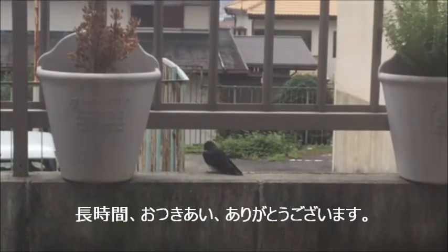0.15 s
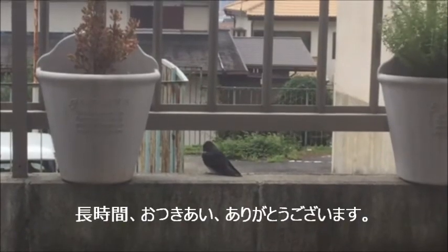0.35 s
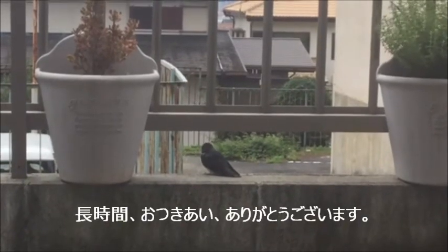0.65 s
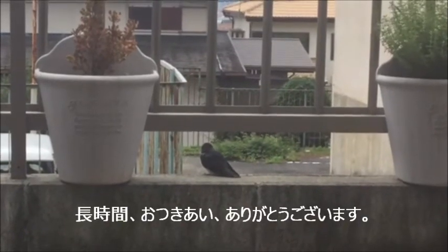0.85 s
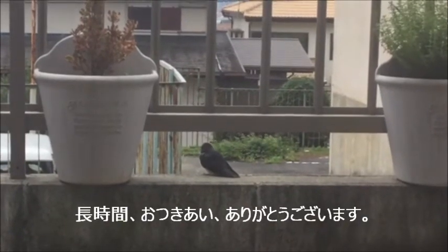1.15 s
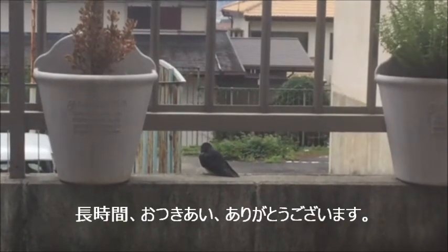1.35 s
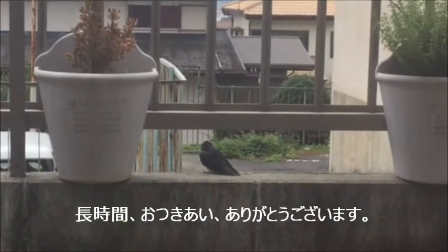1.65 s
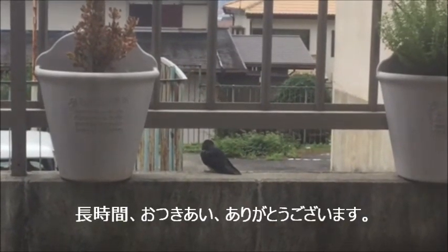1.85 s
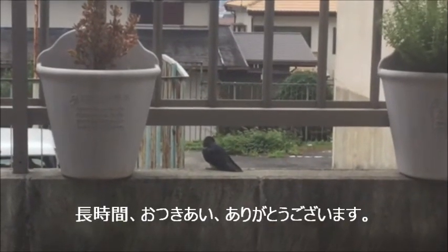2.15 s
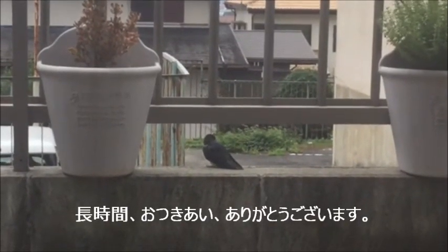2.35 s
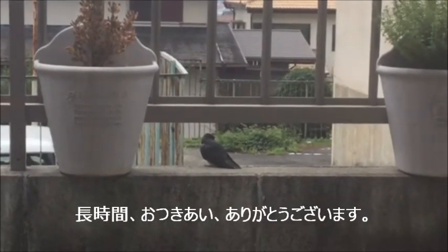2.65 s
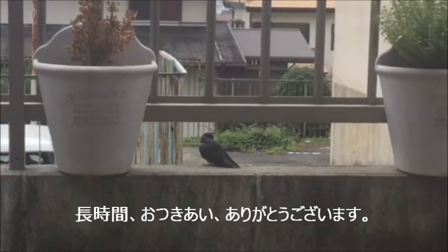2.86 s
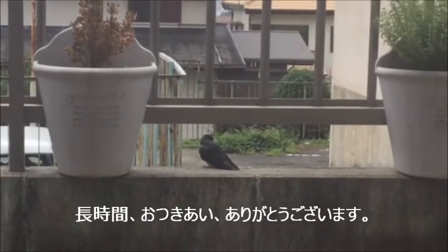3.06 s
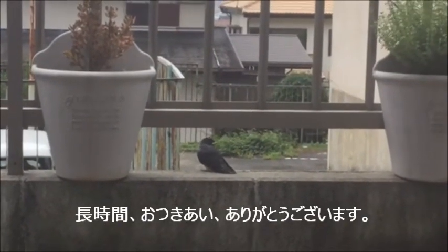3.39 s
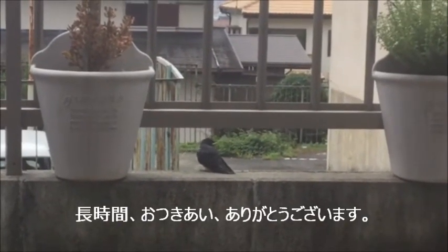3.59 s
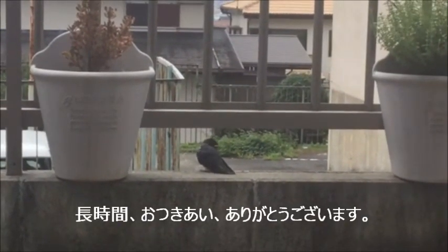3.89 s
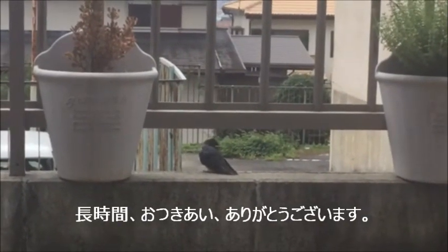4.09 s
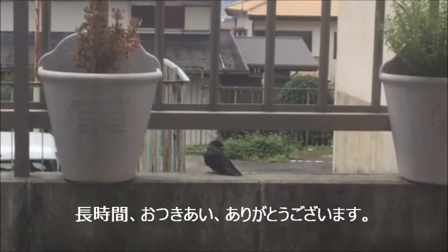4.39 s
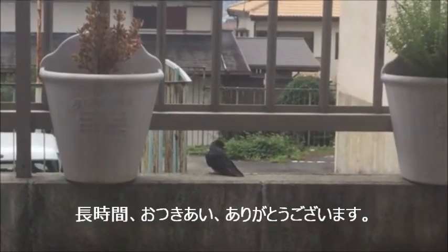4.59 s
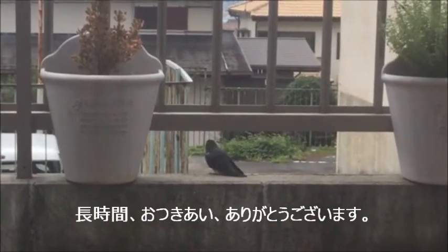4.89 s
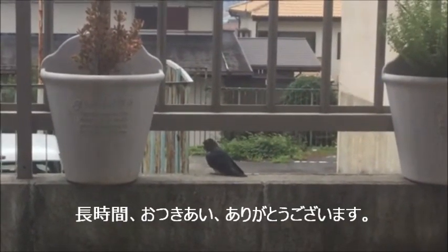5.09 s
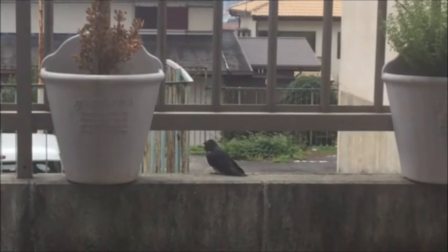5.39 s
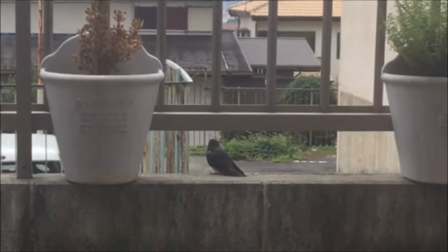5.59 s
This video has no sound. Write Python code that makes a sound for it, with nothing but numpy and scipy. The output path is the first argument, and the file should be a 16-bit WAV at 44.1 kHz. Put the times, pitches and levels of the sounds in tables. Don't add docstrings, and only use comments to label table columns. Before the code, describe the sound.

A quiet outdoor balcony in a residential area, with faint traffic murmur, soft air hiss and light low wind flutter on the microphone throughout. A gust makes a dull double thump around 0.25-0.35 s. A swallow chick then begs in very short, high, sharp chirps, each under a tenth of a second, dipping and rising in pitch with a buzzy, many-toned edge and a brief ring off ledge and houses: at 0.47 s, weaker at 1.94, stronger at 3.33, loudest at 3.94, then 4.65 and 5.29. A tiny thin tick comes at 0.76, a dry echoing snap at 2.48 and a weaker one at 3.05. A faint motor hum swells near 3.1. Far away a crow caws hoarsely about 2.1, 2.8, 3.4, 4.05 and 4.7 s. Very faint small-bird tweets appear near the start, at 1.26, and between 3.3 and 4.4 s.

```python
import sys
import numpy as np
from scipy import signal
from scipy.fft import rfft, irfft, next_fast_len
from scipy.io import wavfile
from scipy.ndimage import uniform_filter1d, map_coordinates

SR = 44100
rng = np.random.default_rng(int(sys.argv[2]) if len(sys.argv) > 2 else 0)


def ratio_of_db(decibels):
    return 10 ** (np.asarray(decibels, float) / 20)


def wrap_up_sound(samples):
    columns = np.atleast_2d(samples).T
    tamed = np.clip(columns, -1, 1)
    steps = np.round(tamed * 32767).astype(np.int16)
    wavfile.write(sys.argv[1], SR, steps)


N = 253134
T = np.arange(N) / SR
NOTE = SR // 3


def unit(x):
    return x / np.sqrt(np.mean(x ** 2) + 1e-20)


def along(points, hz):
    f, value = np.transpose(points)
    return np.interp(np.log(hz + 1), np.log(f + 1), value)


def wobble(rate, size=N):
    knots = rng.standard_normal(int(size * rate / SR) + 4)
    return map_coordinates(knots, [np.arange(size) * rate / SR])


def filtered(x, response):
    m = next_fast_len(len(x) + 8192)
    return irfft(rfft(x, m) * response(np.fft.rfftfreq(m, 1 / SR)), m)[:len(x)]


def noise(spectrum, size=N):
    return unit(filtered(rng.standard_normal(size), lambda hz: ratio_of_db(along(spectrum, hz))))


def add(track, s, x):
    part = track[round(s * SR):][:len(x)]
    part += x[:len(part)]


def puff(hz, db, life):
    u = np.arange(SR // 8) / SR * hz / 1.684
    size = (1 - np.exp(-(u / 0.27) ** 2)) * np.exp(-(u / life) ** 2 / 2)
    return -ratio_of_db(db) * size * np.sin(2 * np.pi * 1.68 * np.log(1 + u))


def eddies(spectrum, low_hz, high_hz, share):
    single = np.zeros(N)
    for when, pitch, size, side in rng.random((120, 4)):
        swing = puff(low_hz + (high_hz - low_hz) * pitch, -2.3 * np.log(size), 2.34)
        add(single, when * N / SR, np.sign(side - .5) * swing)
    single = filtered(single, lambda hz: np.minimum(1, ratio_of_db(along(spectrum, hz) + 9)))
    lumps = ratio_of_db(2.73 * wobble(9) + 2.4 * wobble(28))
    return unit(unit(lumps * noise(spectrum)) + share * unit(single))


# (t/s, strength level/dB, big over small eddies level/dB)
BUFFET = [(0.0, -60, 0.5), (0.34, -62, 0), (0.51, -66, 1.5), (0.75, -63.5, -3.5), (0.96, -59.5, 1),
          (1.17, -61, 4.5), (1.31, -61, 0.5), (1.77, -61.5, -2), (1.93, -64, 2), (2.14, -65, -1.5),
          (2.48, -57.5, -2.5), (2.59, -57.5, 3), (2.81, -59.5, -1), (3.77, -59, 0.5), (4.65, -62, 0),
          (5.07, -60, 0), (5.45, -59, 3), (5.74, -59, -4)]
# (f/Hz, level/dB per Hz)
BIG_EDDIES = [(20, -41), (35, -5), (60, -2.5), (100, 4.5), (140, -8), (250, -45.5)]
# (f/Hz, level/dB per Hz)
SMALL_EDDIES = [(80, -29.5), (130, -2), (185, 2), (250, -6), (350, -9.5), (450, -24.5), (700, -48.5)]
# (t/s, start f/Hz, peak level/dB, life/glide times)
GUST = [
    (0.2452, 176, -32.5, 6.8),
    (.277, 248, -27.5, 1.6),
    (.298, 290, -22.5, 2.5),
    (0.321, 110, -37.5, 1.4),
    (0.349, 148, -41, 0.91),
    (0.367, 205, -36, 1.17),
]


def wind():
    s, strength_db, size_db = np.transpose(BUFFET)
    big_db = np.interp(T, s, strength_db + size_db / 2)
    small_db = np.interp(T, s, strength_db - size_db / 2) + 0.5
    out = ratio_of_db(big_db) * eddies(BIG_EDDIES, low_hz=110, high_hz=219, share=0.59)
    out += ratio_of_db(small_db) * eddies(SMALL_EDDIES, low_hz=228, high_hz=492, share=0.57)
    gust = np.zeros(N)
    for s, hz, db, life in GUST:
        add(gust, s + 0.00091, puff(hz, db, life))
    return out + filtered(gust, lambda f: 1 / (1 + (f / 430) ** 6))


# (t/s, town level/dB, hiss level/dB)
AIR = [(0, -69, -77.5), (1.3, -70.5, -81), (2.1, -69, -79), (5.74, -69.5, -80)]
# (f/Hz, level/dB per Hz)
TRAFFIC = [(200, -16.5), (350, -6), (450, -10), (700, -10), (1100, -12.5), (1400, -14.5), (2000, -19.5),
           (3000, -28.5), (5000, -42.5)]
# (f/Hz, level/dB per Hz)
HISS = [(1180, -19), (2000, -22), (2120, -6.5), (2700, -6), (3210, -3.5), (4010, -1.5), (5230, -4.5),
        (6150, -10), (8170, -10), (10000, -11.5), (15500, -17)]
# (f/Hz, width f/Hz, [(t/s, level/dB)])
HUMS = [
    (766.7, 10.5, [(0, -77.5), (1.2, -75), (1.6, -93), (2.9, -88), (3.12, -67.5), (3.4, -100), (5.74, -92)]),
    (13200, 24, [(0, -99), (.4, -100), (.6, -115), (5.74, -115)]),
]


def town():
    s, town_db, hiss_db = np.transpose(AIR)
    out = ratio_of_db(np.interp(T, s, town_db) + 1.0 + 0.33 * wobble(11.0)) * noise(TRAFFIC)
    out += ratio_of_db(np.interp(T, s, hiss_db) + 2.5 + 0.22 * wobble(4.7)) * noise(HISS)
    for hz, width_hz, level in HUMS:
        band = filtered(rng.standard_normal(N), lambda f: np.exp(-((f - hz) / width_hz) ** 2))
        out += ratio_of_db(np.interp(T, *np.transpose(level))) * unit(band)
    return out


# (f/Hz, t60 t/s)
HOUSES = [(500, .5), (2500, 0.55), (4400, 0.67), (6500, 0.48), (15000, 0.13)]


def walls(x, near_db, far_db, gap):
    hz, t, z = signal.stft(rng.standard_normal(SR), SR, nperseg=256)
    fade = ratio_of_db(-60 * t / along(HOUSES, hz)[:, None])
    far = signal.istft(z * fade, SR, nperseg=256)[1][:SR]
    near = filtered(rng.standard_normal(SR), lambda f: 1 / (1 + (f / 6000) ** 2))
    near *= ratio_of_db(-60 * T[:SR] / 0.1)
    tail = ratio_of_db(near_db) * near / np.linalg.norm(near) + ratio_of_db(far_db) * far / np.linalg.norm(far)
    return signal.fftconvolve(x, np.r_[1, np.zeros(round(gap * SR)), tail])


# (t/s, length t/s, start f/Hz, end f/Hz, level/dB)
TWEETS = [
    (.04, .05, 4900, 4800, -82),
    (.235, .1, 4400, 3700, -74),
    (1.258, .014, 5200, 5100, -78),
    (3.3, .02, 5100, 5000, -77),
    (3.515, .025, 3800, 3650, -72),
    (3.68, .05, 4100, 5100, -69),
    (4.245, .025, 5000, 4900, -73),
    (4.39, .07, 5000, 5000, -79),
    (4.415, .02, 4200, 4150, -74),
]


def tweets():
    out = np.zeros(N)
    for s, length, start_hz, end_hz, db in TWEETS:
        u = np.arange(0, length, 1 / SR) / length
        hz = end_hz + (start_hz - end_hz) * (1 - u) ** 1.5 + 110 * wobble(183, size=NOTE)[:len(u)]
        whistle = ratio_of_db(db) * np.sin(np.pi * u) * np.sin(2 * np.pi * np.cumsum(hz) / SR)
        add(out, s, walls(whistle, near_db=-4, far_db=-14, gap=.008))
    return out


def effort(t, s, length, crest_db, swell):
    release_s = .018
    let_go = length - release_s
    spent_db = crest_db + 3.5 - 450 * swell
    upper = np.interp(t, [0, swell, let_go, length], [crest_db - 23, crest_db, spent_db, spent_db - 18])
    grown = np.minimum(t / let_go, 1)
    released = np.clip((t - let_go) / release_s, 0, 1)
    start_db, lower_crest_db = -82.5, -53
    lower = start_db + (lower_crest_db - start_db) * grown ** 0.83 - 4.5 * released
    lower += 0.76 * s
    middle = np.interp(t, [0, 0.013, let_go, length], [-56.5, -65, -65, -69])
    middle += 8 * np.sin(np.pi * grown) ** 2
    return np.array([upper, lower, middle])


SLUR = [(0, 1), (.12, .92), (.26, .36), (.46, 0), (.66, .3), (.8, 1), (1, .95)]
MIXES = [(1, 1, -1, 1), (1, -1, 1, 1), (0, -1, 2, 1), (1, 1, 0, 1), (1, 2, -1, 1), (1, -1, 0, 1),
         (0, 0, 2, 2), (1, 0, 1, 2), (2, -1, 0, 1), (2, 0, 0, 0), (1, 2, 0, 1), (2, 1, 0, 1), (2, 0, 1, 2),
         (1, 3, 0, 1), (2, 2, 0, 1), (3, 0, 0, 0), (2, 1, 1, 1)]
MIX_DB = [-1.5, -8.5, -9, -6.5, -18, -20.5, -3.5, -9, -12, -24.5, -15.5, -21, -21, -19.5, -17, -32, -31]
# (f/Hz, level/dB per Hz)
RASP = [(1500, -94), (2200, -18.5), (3300, -15.5), (4300, -5), (5200, -13), (6800, -19), (9000, -23),
        (12000, -33.5), (13700, -27), (15500, -39)]


def chirp(s, length, crest_db, swell, dip):
    t = np.arange(0, length, 1 / SR)
    u = t / length
    slur = uniform_filter1d(np.interp(u, *np.transpose(SLUR)), size=300, mode="nearest")
    reach = np.where(u < .5, 249 + 13000 * swell, 4740 - dip)
    upper_hz = dip + slur * reach
    lower_hz = .571 * dip + slur * 150
    middle_hz = 3016 + 190 * (slur - .3) * np.minimum(u / 0.067, 1)
    hz = np.array([upper_hz, lower_hz, middle_hz])
    unsteady = 0.71 + (1 - 0.71) * u
    hz += [[55], [22], [90]] * unsteady * np.array([wobble(260.2, size=NOTE)[:len(t)] for _ in hz])
    db = effort(t, s, length, crest_db, swell)
    throb_db = [[3], [2.1], [4]]
    db += throb_db * unsteady * np.array([wobble(279, size=NOTE)[:len(t)] for _ in hz])
    late_db = -25 * np.clip(1 - u / 0.12, 0, 1)
    db[0] += late_db
    phase = 2 * np.pi * np.cumsum(hz, axis=1) / SR
    voices = np.sum(ratio_of_db(db + 2.5) * np.sin(phase), axis=0)
    for (*times, lead), mix_db in zip(MIXES, MIX_DB):
        flicker = 3.2 * wobble(220, size=NOTE)[:len(t)] + times[0] * late_db
        voices += ratio_of_db(db[lead] + mix_db + flicker) * np.sin(times @ phase)
    rasp_db = .5 * (db[0] + np.maximum(db[1], db[2])) - 2.5
    rasp = ratio_of_db(rasp_db) * noise(RASP, size=NOTE)[:len(t)]
    edge = np.clip(np.minimum(t / .003, (length - t) / .005), 0, 1)
    return edge * (voices + rasp)


# (t/s, length t/s, crest level/dB, swell t/s, dip f/Hz)
CHIRPS = [
    (0.467, 0.091, -39.5, 0.019, 4425),
    (1.94, .08, -42.5, .015, 4313),
    (3.333, 0.091, -37.5, 0.03, 4278),
    (3.942, .093, -37, 0.037, 4342),
    (4.648, .085, -39, 0.0267, 4244),
    (5.294, 0.086, -39.5, 0.019, 4272),
]
# (f/Hz, width f/Hz, level/dB)
NOTCHES = [(5800, 550, -3.5), (7800, 200, -7), (10000, 960, -8.5)]


def chick():
    out = np.zeros(N)
    for s, *call in CHIRPS:
        add(out, s, walls(chirp(s, *call), near_db=-7.0, far_db=-20.0, gap=.008))
    return filtered(out, lambda f: ratio_of_db(sum(db * np.exp(-((f - hz) / width) ** 2) for hz, width, db in NOTCHES)))


# (t/s, level/dB, t60 t/s, lowest f/Hz, highest f/Hz)
SNAPS = [
    (2.476, -54.5, 0.031, 480, 26000),
    (3.047, -65, 0.026, 2700, 5400),
    (.764, -61, 0.011, 10200, 17000),
]
# (f/Hz, level/dB per Hz)
CRACK = [(500, -22), (1040, -9), (2000, -12), (3500, -1), (5500, -7.5), (8000, -15), (15000, -24)]


def snaps():
    out = np.zeros(N)
    t = np.arange(SR // 10) / SR
    echo_db = 4.5
    for s, db, t60, low_hz, high_hz in SNAPS:
        band = lambda f: 1 / (1 + (low_hz / (f + 1)) ** 6) / (1 + (f / high_hz) ** 4)
        crack = ratio_of_db(db - 60 * t / t60) * unit(filtered(noise(CRACK, size=len(t)), band))
        add(out, s, walls(crack, near_db=echo_db, far_db=echo_db - 4, gap=.004))
    return out


# (t/s, length t/s, level/dB)
CAWS = [
    (2.08, .28, -73.5),
    (2.76, .2, -71.5),
    (3.42, .25, -75),
    (4.05, .22, -76),
    (4.72, .22, -73),
]
# (f/Hz, width f/Hz, level/dB)
THROAT = [(1060, 90, -4), (1345, 80, 0)]


def caws():
    out = np.zeros(N)
    throat = lambda f: sum(ratio_of_db(db) * 1j * f * w / (c * c - f * f + 1j * f * w) for c, w, db in THROAT) ** 2
    for s, length, db in CAWS:
        u = np.arange(0, length, 1 / SR) / length
        rattle = (rng.standard_normal(NOTE) * ratio_of_db(2.8 * wobble(73.4, size=NOTE)))[:len(u)]
        caw = ratio_of_db(db) * np.sqrt(np.sin(np.pi * u)) * unit(filtered(rattle, throat))
        add(out, s, walls(caw, near_db=-13, far_db=-17, gap=.01))
    return out


def scene():
    return (wind() + town() + tweets() + chick() + snaps() + caws())[None]


def band_limit(x):
    return signal.sosfilt(signal.butter(12, 15690, fs=SR, output="sos"), x)


def record(dry):
    heard = filtered(dry[0], lambda f: (f < 15700) / (1 + (42 / (f + 1)) ** 8))
    return band_limit(heard[None])


dry = scene()
out = record(dry)
wrap_up_sound(out)
```